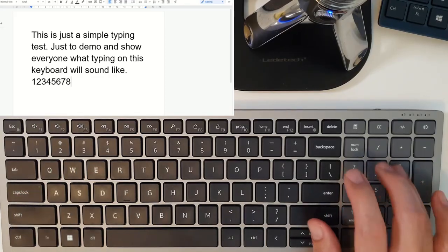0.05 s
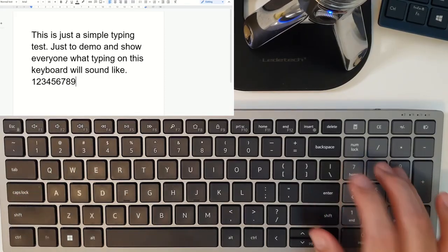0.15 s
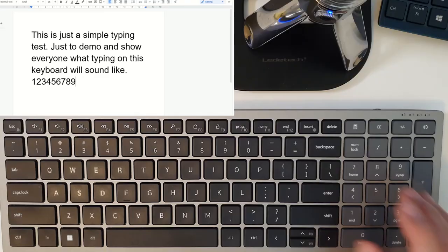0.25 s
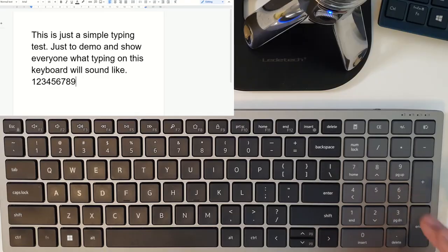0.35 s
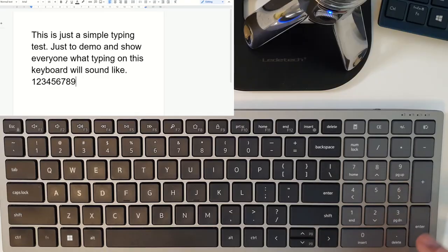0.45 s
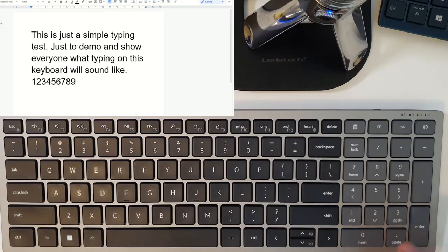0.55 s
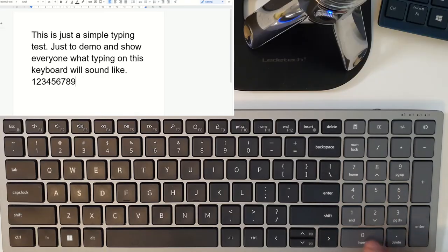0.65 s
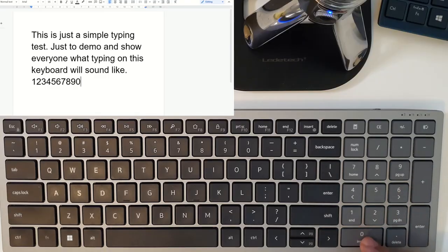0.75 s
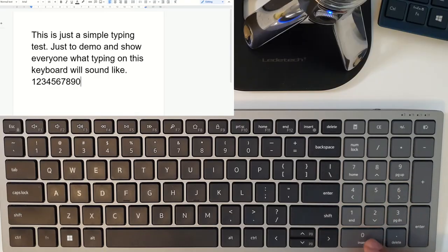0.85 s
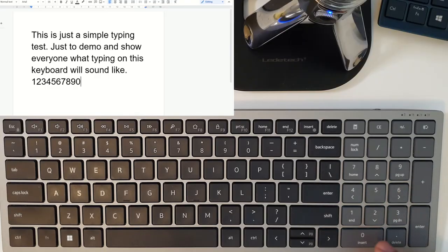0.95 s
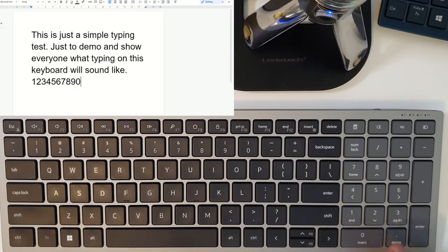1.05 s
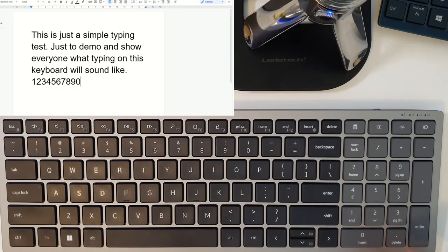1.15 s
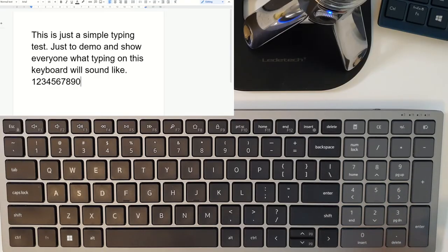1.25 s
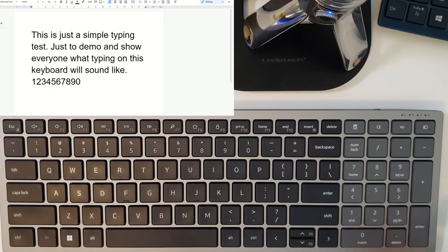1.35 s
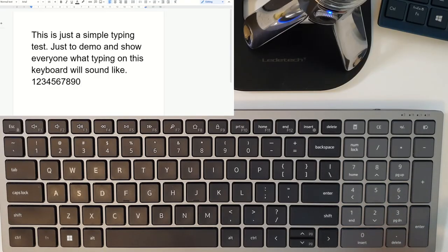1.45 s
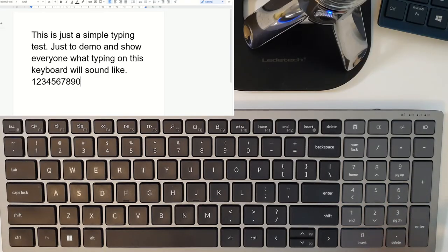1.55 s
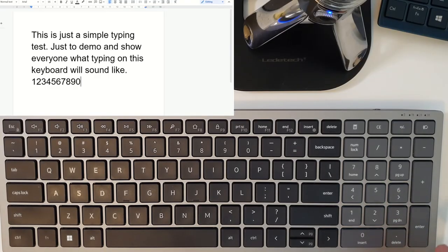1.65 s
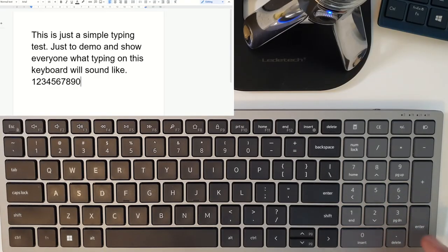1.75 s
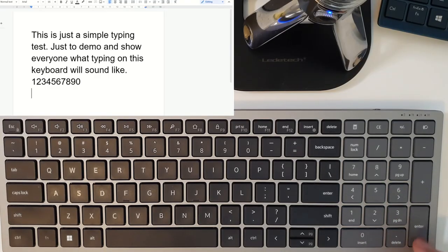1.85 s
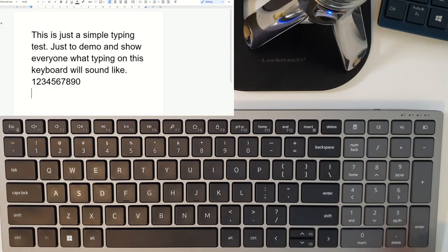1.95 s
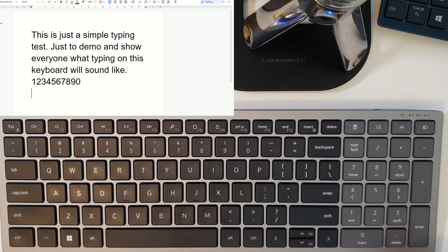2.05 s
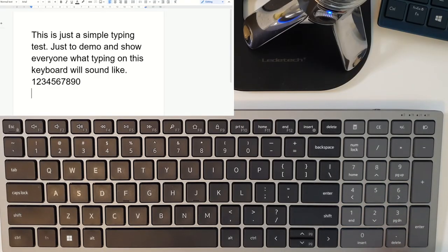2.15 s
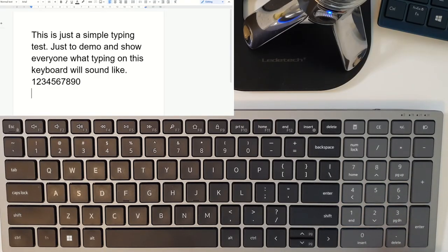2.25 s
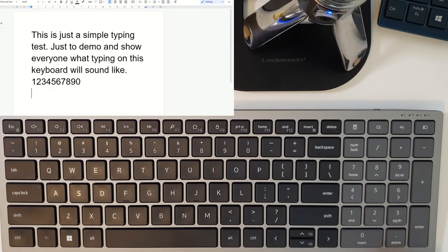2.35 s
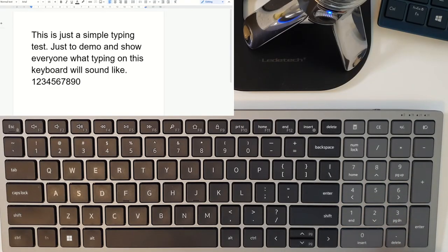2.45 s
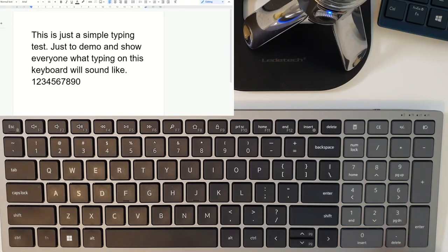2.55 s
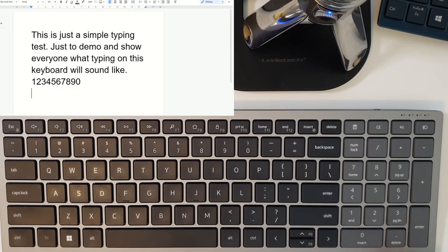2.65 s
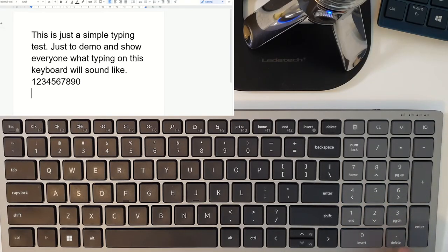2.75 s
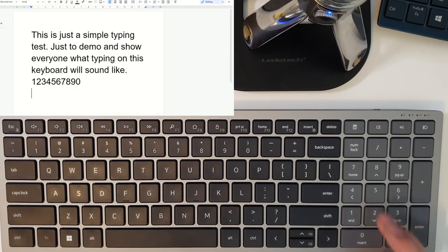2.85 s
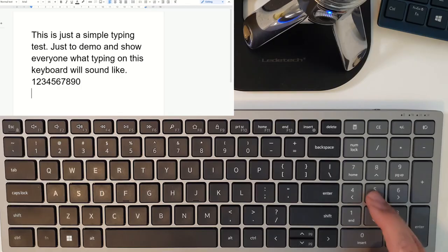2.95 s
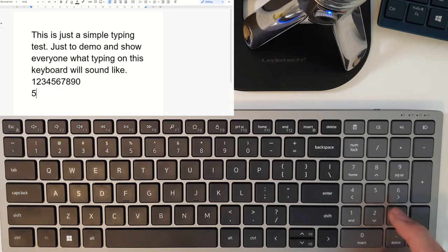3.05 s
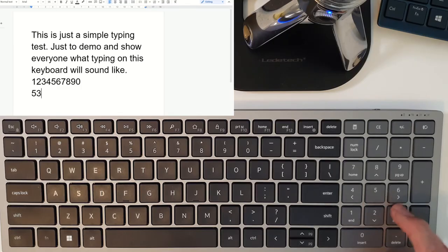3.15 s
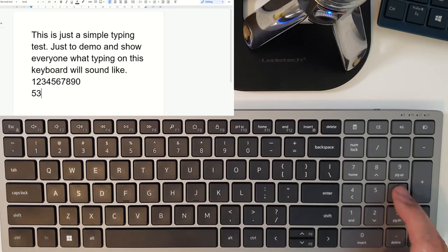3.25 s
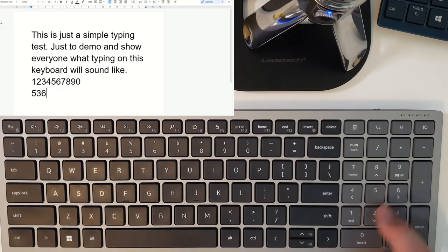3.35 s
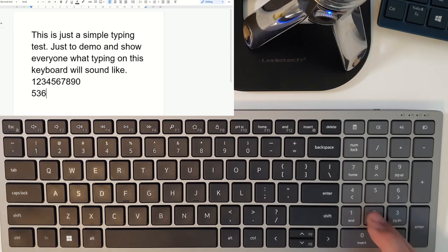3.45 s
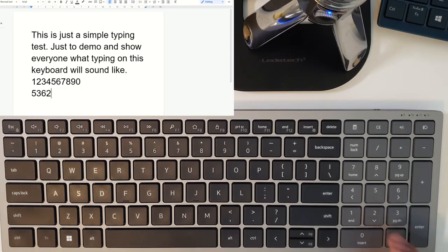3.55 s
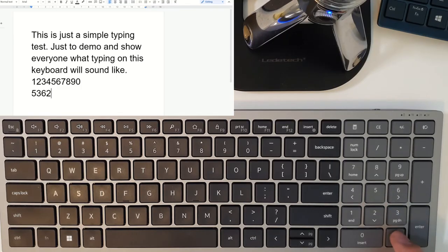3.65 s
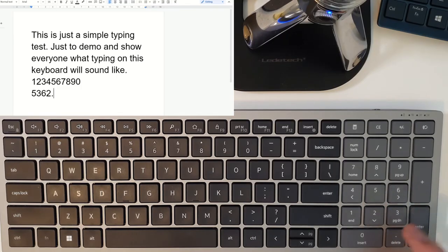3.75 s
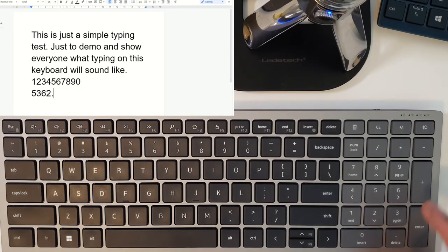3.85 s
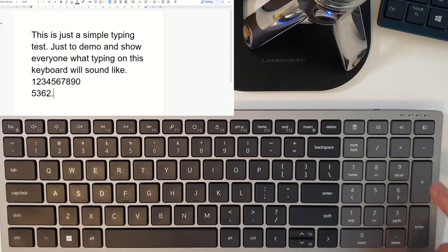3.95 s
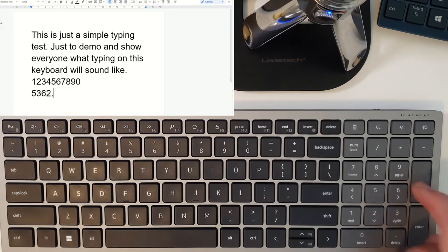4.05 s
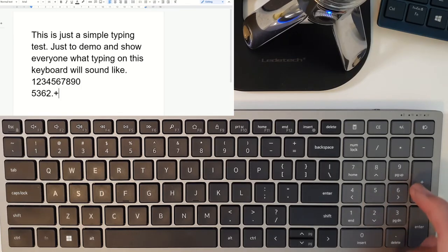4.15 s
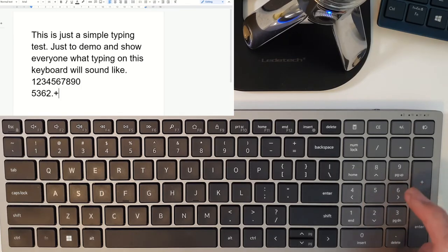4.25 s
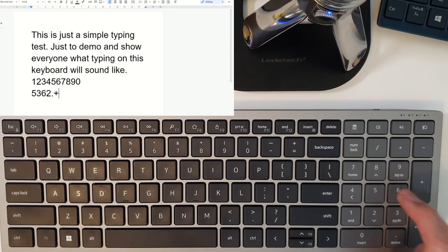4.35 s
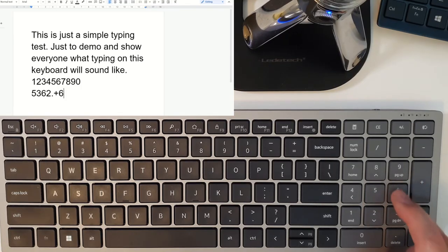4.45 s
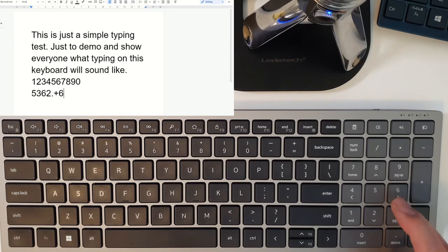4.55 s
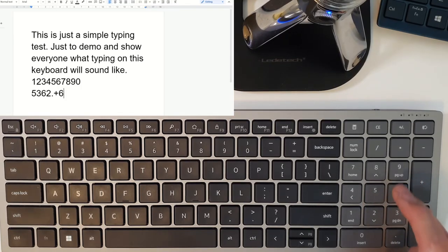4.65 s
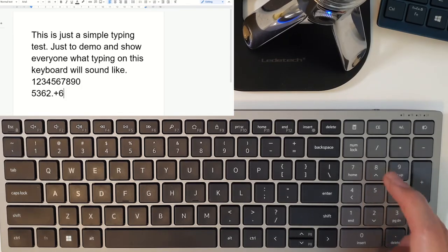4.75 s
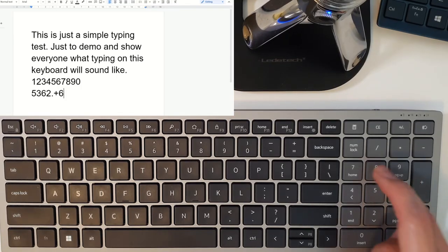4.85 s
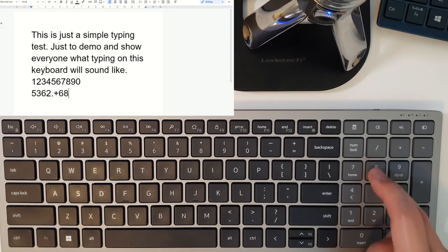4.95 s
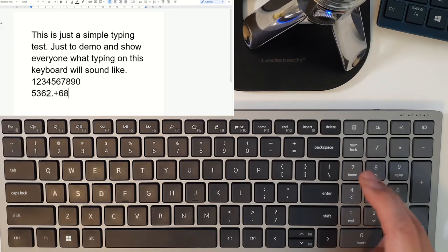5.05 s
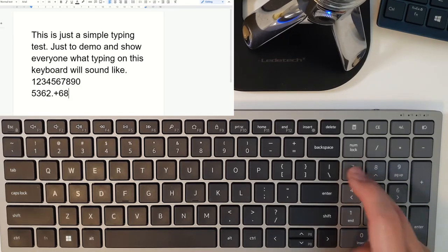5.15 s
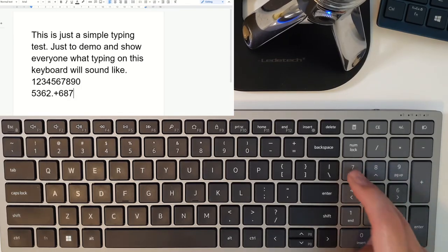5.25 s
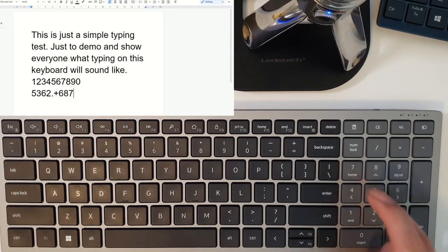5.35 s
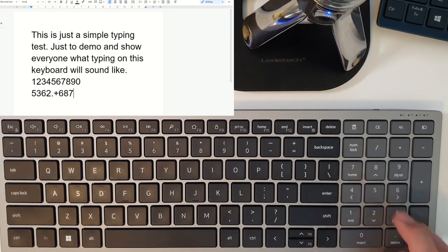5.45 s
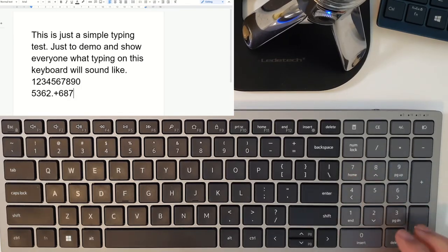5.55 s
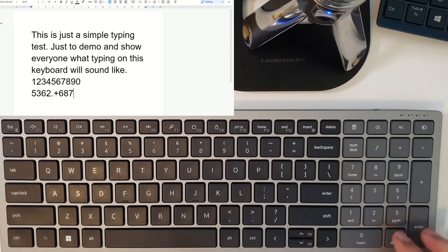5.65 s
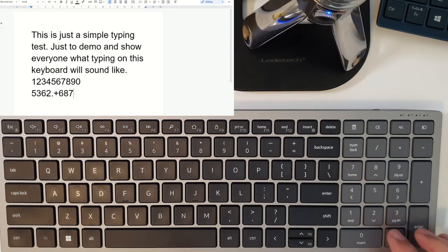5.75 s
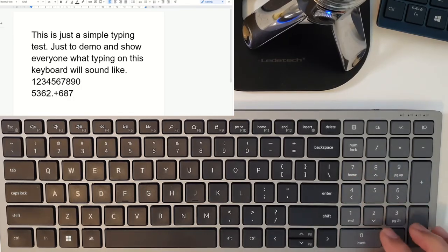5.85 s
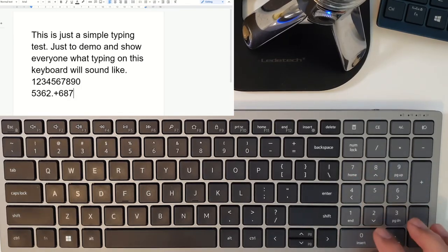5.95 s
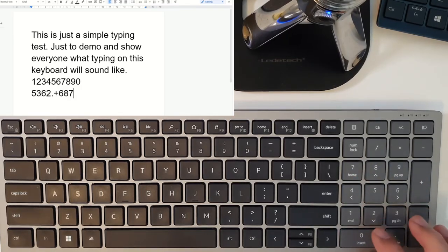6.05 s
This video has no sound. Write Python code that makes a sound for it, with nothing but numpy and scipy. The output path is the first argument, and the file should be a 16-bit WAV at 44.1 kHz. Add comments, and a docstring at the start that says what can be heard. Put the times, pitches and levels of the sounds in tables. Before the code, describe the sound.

Close, unhurried key presses on a thin keyboard's numeric keypad sound over a faint fan hum in a small room. A couple of light ticks and two separate, harder clacks give way to a short pause, then about nine uneven taps. Each has a plastic click and a low thud from the case and desk, usually followed by a softer release click. A few keys leave a thin metallic ring.

```python
"""A fan hums faintly while one hand taps figures on the keypad of a slim keyboard, near a microphone.
First a fingertip ticks on the cap; then the key bottoms out with a clack that sets the thin deck ringing.
The same blow thumps the case and the desk and sways the microphone stand, and a small room answers.
Last, the finger slides off and the key clicks as it springs back. Some keys leave a thin metallic ring."""
import sys
import numpy as np
from scipy import signal
from scipy.fft import rfft, irfft
from scipy.io import wavfile
from scipy.ndimage import uniform_filter1d

SR = 44100
rng = np.random.default_rng(int(sys.argv[2]) if len(sys.argv) > 2 else 0)


def dump_mix(stems):
    """Bounce the given channels to the path in sys.argv[1] as a 16-bit WAV at rate SR."""
    frames = np.atleast_2d(stems).T  # one column per channel
    limited = np.clip(frames, -1, 1)  # hard clip at full scale
    pcm = np.round(limited * 32767).astype(np.int16)
    wavfile.write(sys.argv[1], SR, pcm)


N = 269010
CLICK_SIZE = 4096

# Keys bottoming out. Each row: time in seconds, travel from first touch in seconds, finger speed and
# hand weight in dB relative to a hard stroke, nearness to the case edge from 0 to 1, knock in Hz,
# case tilt in dB/octave, deck's answer in dB, click tilt in dB/octave, cap resonance in Hz,
# its height in dB, click t60 in seconds.
STRIKES = [(0.074, 0.0018, -25.5, -17.5, 0.17, 134, -2.5, -7, 1.8, 3750, 7, 0.011),
           (.173, .0025, -29, -21.5, 0.38, 188, 1.5, -11, -6, 5810, 3, 0.0069),
           (0.7012, 0.0047, 1.5, -2.5, 0, 180, -5.5, 2, -3, 4550, 18.5, 0.01),
           (1.8093, .004, -2, 0.5, 0.85, 183, -4.5, 2, 0, 6700, 1.5, 0.012),
           (2.9539, 0.005, -8, -4, 0.1, 208, -6, -3.5, -6, 2600, 3, 0.011),
           (3.114, 0.0091, -16.5, -5.5, 0.2, 138, -2.5, -2, -5, 3470, 9, 0.014),
           (3.278, 0.01, -23.5, -12, 0.19, 217, -5, -2, -3.5, 5810, 0, 0.012),
           (3.427, 0.009, -30.5, -16.5, 0, 132, -10, 0, -6, 8500, 10, 0.027),
           (3.633, .006, -9.5, -1.5, .05, 161, -11, 1, -1, 2100, 6.5, 0.019),
           (4.0845, 0.0043, 1, -1.5, 1, 211, 1.5, -1, -4, 4800, 8, 0.0091),
           (4.4162, 0.0057, -18.5, -3.5, 0.1, 327, 2, 1, -4.5, 2720, 3.5, 0.024),
           (4.9058, 0.00084, -11, -4.5, 0.9, 235, -1, 1.5, 2, 7450, 3, 0.0072),
           (5.192, .0054, -11, -2, .05, 270, -0.5, 7.5, -0.5, 2010, 14.5, 0.022)]


def undb(db):
    """Amplitude grows tenfold for every 20 dB."""
    return 10 ** (np.asarray(db) / 20)


def decay(t, t60):
    """Damping: amplitude falls exponentially, by 60 dB in t60 seconds."""
    return np.exp(-np.log(1000) * t / t60)


def add(track, s, sound):
    """Superposition: a sound adds to the track from s seconds on."""
    start = max(int(s * SR), 0)
    track[..., start:start + sound.shape[-1]] += sound[..., :N - start]


def curve(points, hz):
    """A spectral envelope in dB, interpolated on a log-frequency axis."""
    point_hz, db = np.transpose(points)
    return np.interp(np.log(hz), np.log(point_hz), db)


def bins(size):
    """Fourier frequencies in Hz, kept above zero."""
    return np.maximum(np.fft.rfftfreq(size, 1 / SR), 1)


def colour(x, db):
    """A minimum-phase filter applies a gain per bin causally, so attacks stay sharp."""
    cepstrum = irfft(np.log(undb(db)))
    cepstrum[1:len(x) // 2] *= 2
    cepstrum[len(x) // 2 + 1:] = 0
    return irfft(rfft(x) * np.exp(rfft(cepstrum)))


def burst_level(x, db, span_s=0.01):
    """Equivalent level: scale a burst so that its energy, spread over the span, gives db."""
    return x * undb(db) * np.sqrt(span_s * SR / np.sum(x ** 2))


def power_law(effort_db, hard_db, exponent):
    """A power law is a straight line in dB, here through hard_db at a hard stroke."""
    return hard_db + exponent * effort_db


def ring(modes, size, tilt_db=0, scatter_db=4.5, pivot_hz=200):
    """Modal vibration: a sum of damped sines, whose shares vary at random from blow to blow."""
    t = np.arange(size) / SR
    out = np.zeros(size)
    for hz, db, t60, swing in modes:
        gain = undb(db + tilt_db * np.log2(hz / pivot_hz) + scatter_db * rng.standard_normal())
        out += np.sign(swing) * gain * np.sin(2 * np.pi * hz * t) * decay(t, t60)
    return out


def fan_and_whine():
    """Incoherent noises add in power: fan air and narrow hums, joined by a thin electrical whine."""
    # Fan air and microphone hiss. Each row: frequency in Hz, density in dB per Hz.
    noise_floor = [(25, -102.5), (45, -93), (80, -92.5), (130, -101), (270, -105), (410, -100), (520, -110),
                   (900, -113), (1700, -114), (2300, -117.5), (3200, -114.5), (4900, -115.5), (5800, -121),
                   (9000, -125), (15500, -127)]
    # Fan hum. Each row: centre in Hz, width in Hz, rms level in dB.
    hums = [(226.6, 4.3, -83.5), (344.2, 37, -79.5), (765, 13, -94.5)]
    # Electrical whine. Each row: frequency in Hz, rms level in dB.
    whine_tones = [(1000, -90), (2000, -93.5), (3000, -95)]
    hz, t = bins(N), np.arange(N) / SR
    power = undb(curve(noise_floor, hz)) ** 2
    for centre, width, db in hums:
        power += undb(db) ** 2 * np.exp(-np.pi * ((hz - centre) / width) ** 2) / width
    air = irfft(rfft(rng.standard_normal(N)) * np.sqrt(power * SR / 2), N)
    return air + sum(np.sqrt(2) * undb(db) * np.sin(2 * np.pi * f * t) for f, db in whine_tones)


def thumps(soft_hz=800, edge_rock_db=13.5, scatter_db=2.44):
    """Structure-borne sound: the hand's weight passes through case, desk and stand to the microphone."""
    # Modes. Each row: frequency in Hz, level in dB, t60 in seconds, direction of the first swing.
    stand_sway = [(26.54, -45, 1.26, 1)]
    desk_boom = [(59.6, -45, 0.48, -1), (77.15, -45, 0.75, -1), (88.38, -34.5, 0.5, 1),
                 (107.85, -49.5, 0.81, -1), (137.5, -47.5, 0.43, 1)]
    case_rocking = [(180, -35, 0.16, 1), (201, -34.5, 0.12, -1)]
    case_bending = [(157.2, -31, 0.13, -1), (230.6, -39, 0.19, 1), (290.3, -45, 0.21, 1),
                    (340.9, -47, 0.27, -1), (407.8, -45, 0.17, 1), (431.7, -47.5, 0.15, -1),
                    (528.6, -60, 0.23, 1), (606, -69, 0.11, -1)]
    out, size = np.zeros(N), 2 * SR
    for s, _, speed_db, weight_db, edge, knock_hz, case_tilt_db, *_ in STRIKES:
        add(out, s, knock(knock_hz, power_law(speed_db, -33.5, 0.67)))
        stand_db = power_law(weight_db, 6.65, 0.57)
        desk_db = power_law(weight_db, 0.86, 0.54)
        # the case rocks on its feet most under the keys at its edge
        rock_db = power_law(weight_db, -13, 0.3) + edge_rock_db * edge
        for modes, db in ((stand_sway, stand_db), (desk_boom, desk_db), (case_rocking, rock_db)):
            add(out, s, undb(db) * ring(modes, size, scatter_db=scatter_db))
        bending = ring(case_bending, SR // 2, tilt_db=case_tilt_db, scatter_db=3.5)
        add(out, s, undb(power_law(weight_db, -2, 1.04)) * bending)
    # at the start, desk and case are still ringing from an earlier key
    for modes, db in ((desk_boom, -11), (case_rocking, -18)):
        add(out, 0, undb(db) * ring(modes, size, scatter_db=scatter_db))
    # the soft fingertip passes no treble
    return signal.sosfilt(signal.butter(4, soft_hz, fs=SR, output="sos"), out)


def keycap(db, tilt_db, cap_hz, cap_db, t60, width_octaves=0.21, room_share=0.88):
    """Source and filter: the hollow cap colours a contact's chatter. Rows are direct and room-bound."""
    t, hz = np.arange(CLICK_SIZE) / SR, bins(CLICK_SIZE)
    rise_s = 0.0011 * (t60 / 0.0083) ** 2  # a softer contact both starts and dies more slowly
    attack = 1 - np.exp(-t / rise_s)
    snap = 0.41 * np.exp(-t / 0.00036)
    bounce = 0.073 * np.exp(-((t - 0.38 * t60) / 0.00031) ** 2)  # the cap rocks and its other edge lands
    envelope = (decay(t, t60) + snap) * attack + bounce
    chatter = envelope * rng.standard_normal(CLICK_SIZE)
    # the contact itself is broadband: its colour comes from the cap alone
    smooth_power = uniform_filter1d(np.abs(rfft(chatter)) ** 2, size=45)
    chatter = colour(chatter, -10 * np.log10(smooth_power))
    # Colour common to all caps. Each row: frequency in Hz, gain in dB.
    cap_response = [(300, -18.5), (650, -17), (950, -2.5), (1500, -18), (1750, -2), (2100, -6.5), (2600, 0),
                    (3000, -3.5), (3400, -4.5), (6000, -3), (10000, -6.5), (15000, -13)]
    shape = curve(cap_response, hz) + tilt_db * np.log2(np.maximum(hz / 1900, 1))
    resonance = cap_db / (1 + (np.log2(hz / cap_hz) / width_octaves) ** 2)
    direct = colour(chatter, shape + resonance)
    # the room gathers sound from all sides of the cap, which evens out its peaks
    spread = colour(signal.unit_impulse(CLICK_SIZE), shape + room_share * resonance)
    return np.array([burst_level(direct, db), burst_level(spread, db)])


def deck(db, detune=0.018):
    """Plate modes ring a little differently under every key; neighbouring modes swing opposite ways."""
    # The thin deck under the keys. Each row: frequency in Hz, relative level in dB, t60 in seconds.
    plate_modes = [(600, -12.5, 0.031), (846, -11, 0.0065), (944, -8.5, 0.057), (1204, 1, 0.042),
                   (1356, 0.5, 0.037), (1470, -5, 0.041), (1643, -6, 0.048)]
    modes = [(hz * (1 + detune * rng.standard_normal()), mode_db, t60, (-1) ** k)
             for k, (hz, mode_db, t60) in enumerate(plate_modes)]
    return burst_level(ring(modes, CLICK_SIZE, scatter_db=2.5), db)


def presses(second_landing_s=0.00464):
    """Impact excitation: the touch, then the landing, sounds cap and deck; faster strokes are louder."""
    out = np.zeros((2, N))
    for s, travel_s, speed_db, _, _, _, _, answer_db, *cap in STRIKES:
        touch_db = power_law(speed_db, -53.5, 0.53)
        click_db = power_law(speed_db, -41, 0.99)
        deck_db = power_law(speed_db, -49.5, 0.62) + answer_db
        tick = keycap(touch_db, tilt_db=2.7, cap_hz=8440, cap_db=2.1, t60=0.0077)
        add(out, s - travel_s, tick + deck(touch_db - 13))
        add(out, s, keycap(click_db, *cap) + deck(deck_db))
        add(out, s + second_landing_s, deck(deck_db - 4.5))  # a key pressed off centre lands again
    return out


def knock(hz, db, t60=0.071, rise_s=0.00038):
    """A damped oscillator: the plate gives way under the finger, and a stiffer spot knocks higher."""
    t = np.arange(SR // 2) / SR
    attack = 1 - np.exp(-t / rise_s)
    return -undb(db) * np.sin(2 * np.pi * hz * t) * decay(t, t60) * attack


def room(x, gain_db=-9.5, low_t60=0.42, high_t60=0.28, split_hz=5000, gap_s=0.0031, build_s=0.0015):
    """Reverberation: dense reflections build up in a small room and decay, the treble soonest."""
    # Colour of the reflections. Each row: frequency in Hz, relative gain in dB.
    room_response = [(200, 34), (700, 3.5), (1300, -5.5), (3000, -1.5), (6000, -3.5), (10000, 0),
                     (16000, -6)]
    size = 2 ** 15
    t = np.arange(size) / SR
    noise = rng.standard_normal(size)
    low = signal.sosfiltfilt(signal.butter(2, split_hz, fs=SR, output="sos"), noise)
    tail = low * decay(t, low_t60) + (noise - low) * decay(t, high_t60)
    tail *= 1 - np.exp(-np.maximum(t - gap_s, 0) / build_s)
    tail /= np.sqrt(np.sum(tail ** 2))
    tail = colour(tail, curve(room_response, bins(size)))
    return undb(gain_db) * signal.fftconvolve(x, tail)[:N]


def scuff(length_s, db=-80, centre_hz=10500, width_octaves=0.3):
    """Friction: skin slides off the plastic in a short, grainy swell of high hiss."""
    size = int(length_s * SR)
    grains = rng.standard_normal(CLICK_SIZE)[:size] ** 3
    band = 1 / (1 + (np.log2(bins(CLICK_SIZE) / centre_hz) / width_octaves) ** 2)
    hiss = irfft(rfft(grains * np.hanning(size), CLICK_SIZE) * band)
    return burst_level(hiss, db)


def releases(scuff_s=0.035, rattle_lead_s=0.0056, rattle_db=-73):
    """Elastic return: the finger slides off, and the rising cap rattles just before it hits its stop."""
    # Keys springing back. Each row: time in seconds, click level in dB, cap resonance in Hz,
    # its height in dB, deck level in dB.
    returns = [(0.1822, -73, 8300, 11, -82), (0.8418, -61.5, 5200, 4, -65.5), (1.897, -59, 7800, 13, -86),
               (3.188, -73.5, 6200, 5, -79), (3.341, -70, 5760, 5, -80), (3.5005, -68.5, 9500, 1, -83),
               (3.7058, -69.5, 2640, 11, -81), (4.1597, -69, 6850, 7, -69), (4.4877, -56.5, 3900, 14, -75),
               (4.9716, -65.5, 6240, 6, -76), (5.2596, -64.5, 1930, 11, -74)]
    out = np.zeros((2, N))
    for s, stop_db, cap_hz, cap_db, deck_db in returns:
        add(out, s - scuff_s, scuff(scuff_s))
        for at, db in ((s - rattle_lead_s, rattle_db), (s, stop_db)):
            click = keycap(db, tilt_db=0.2, cap_hz=cap_hz, cap_db=cap_db, t60=0.0089)
            add(out, at, click + deck(deck_db))
    return out


def pings(t60=0.25, detune=0.03, count=14):
    """Free vibration: a metal part under some keys rings on in a cluster of close, high modes."""
    # Metallic rings. Each row: start in seconds, centre in Hz, level in dB.
    clusters = [(0.181, 8260, -84), (1.897, 7400, -73), (2.949, 8080, -68), (4.4092, 8040, -72)]
    out = np.zeros(N)
    for s, hz, db in clusters:
        modes = [(hz * (1 + detune * rng.standard_normal()), db, t60, rng.standard_normal())
                 for _ in range(count)]
        add(out, s, ring(modes, SR // 2) / np.sqrt(count))
    return out


def scene():
    """Direct, reflected and structure-borne sound superpose on the steady background."""
    direct, spread = presses() + releases()
    return (direct + room(spread) + pings() + thumps() + fan_and_whine())[None]


def record(dry):
    """Band limiting: a steep low-pass filter cuts the treble above 15.9 kHz."""
    return signal.sosfilt(signal.ellip(10, .1, 70, 15900, fs=SR, output="sos"), dry)


dry = scene()
out = record(dry)
dump_mix(out)
```